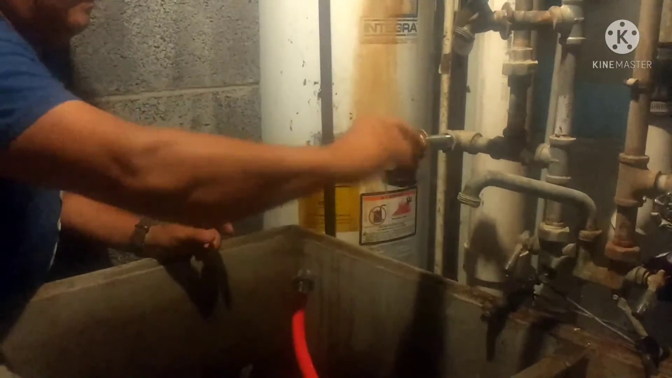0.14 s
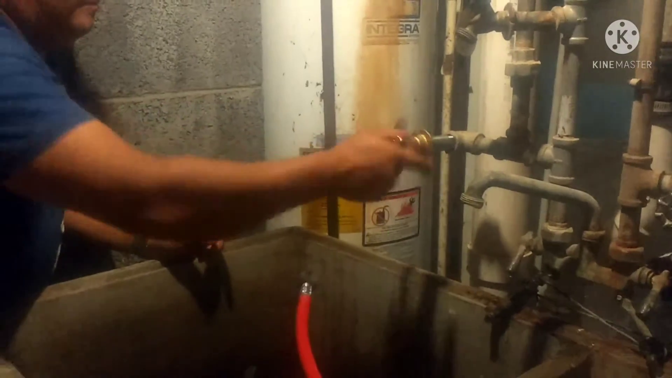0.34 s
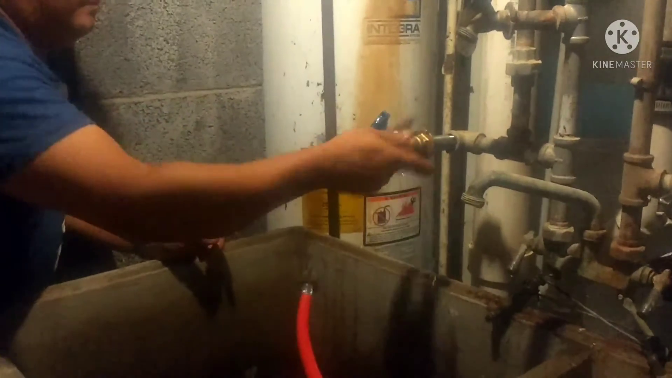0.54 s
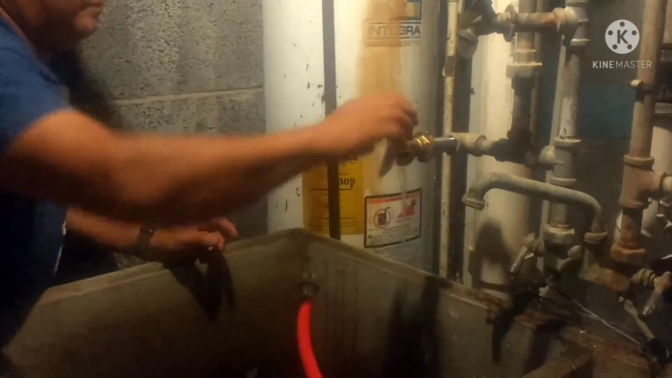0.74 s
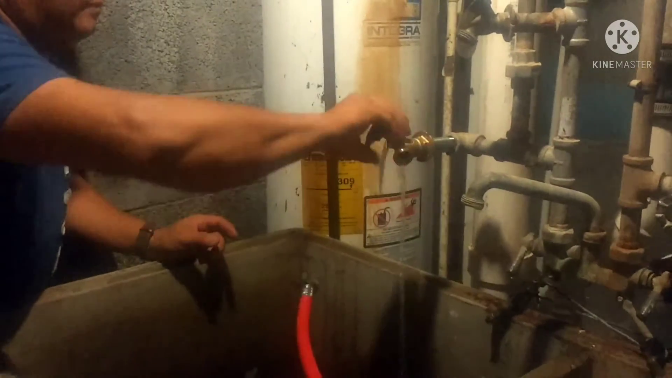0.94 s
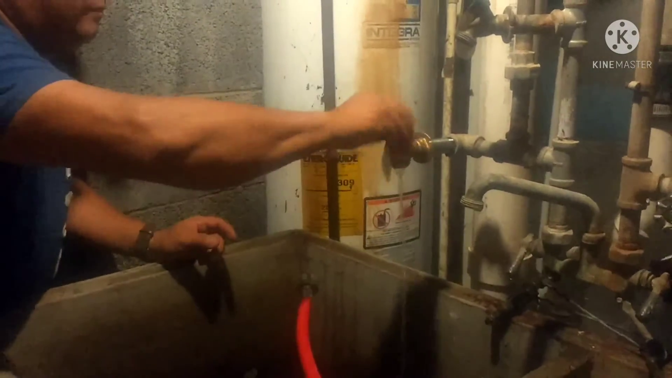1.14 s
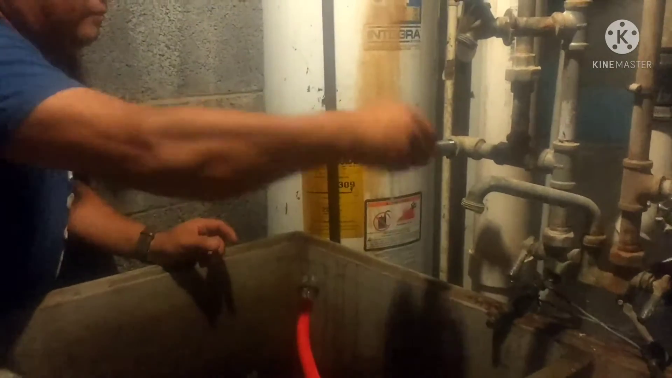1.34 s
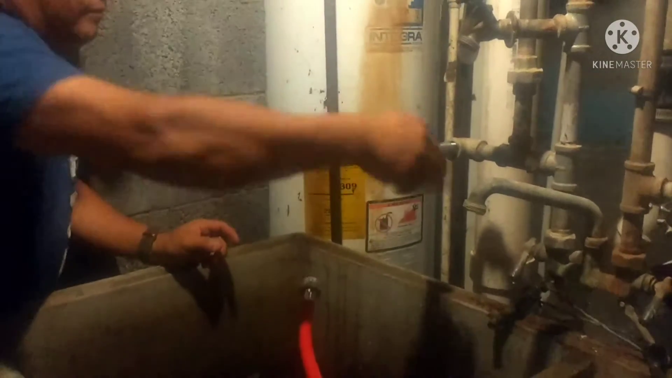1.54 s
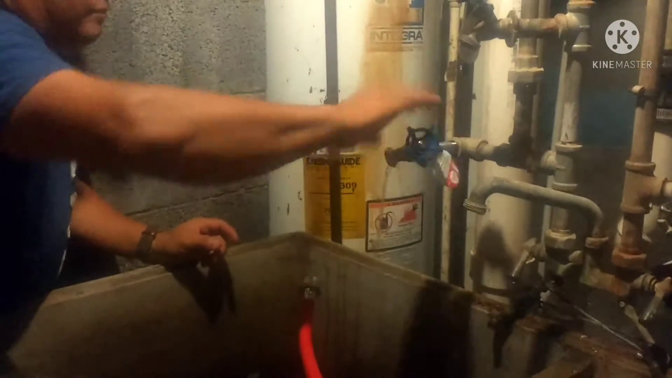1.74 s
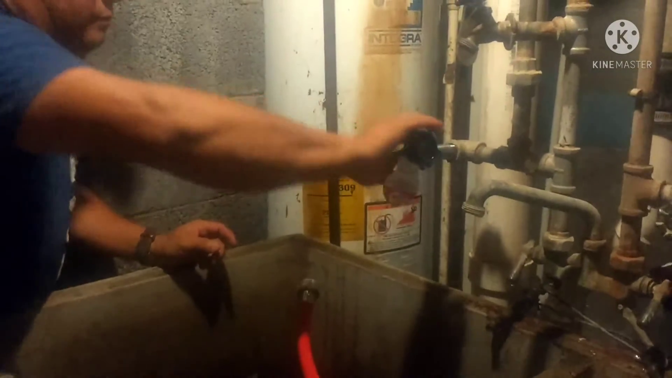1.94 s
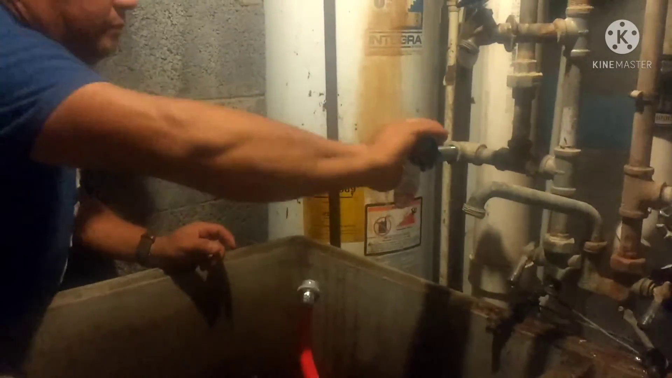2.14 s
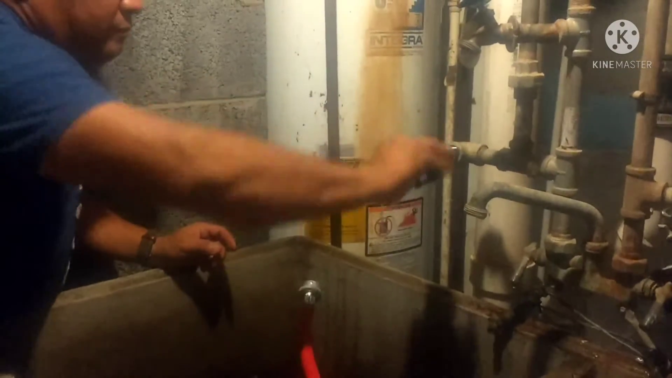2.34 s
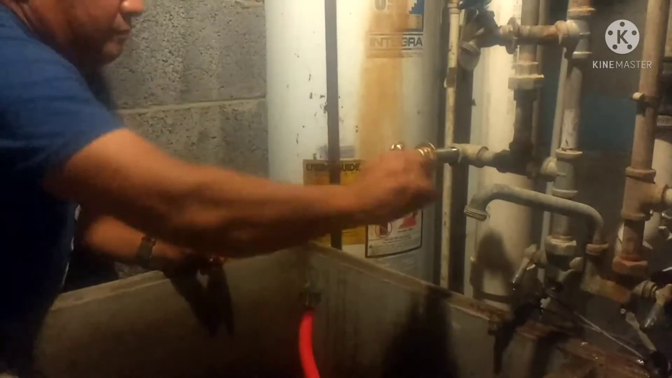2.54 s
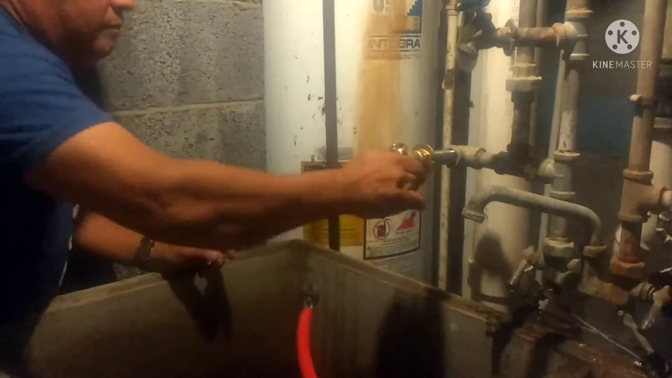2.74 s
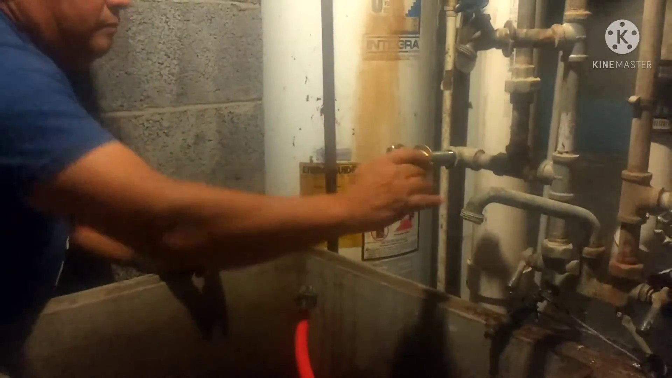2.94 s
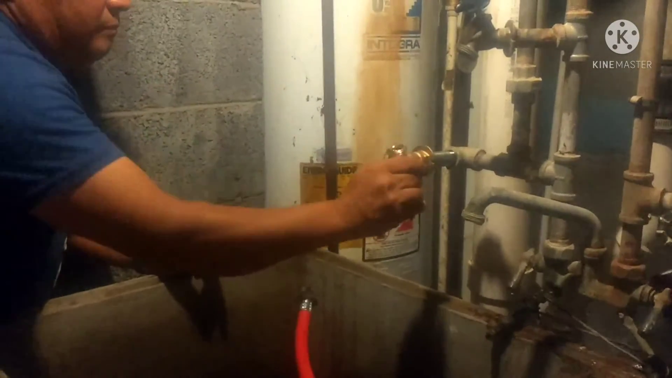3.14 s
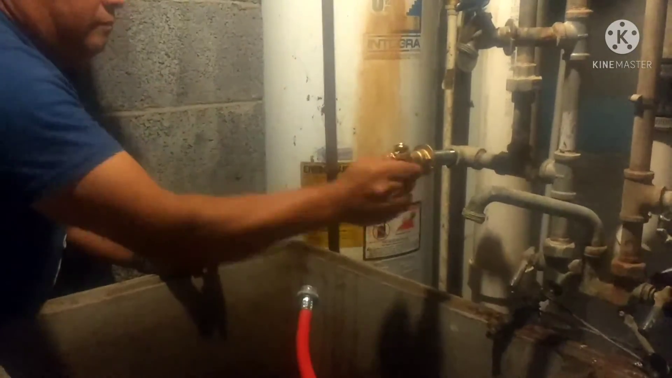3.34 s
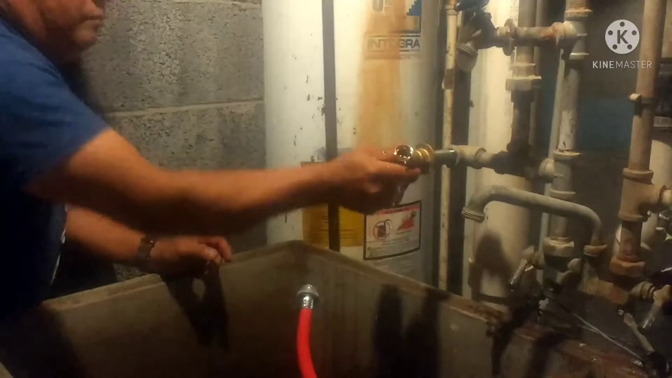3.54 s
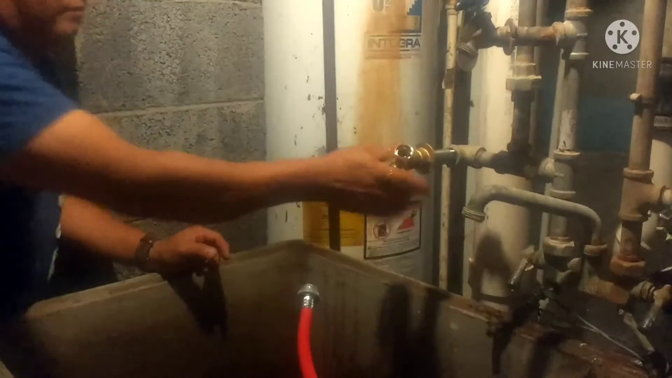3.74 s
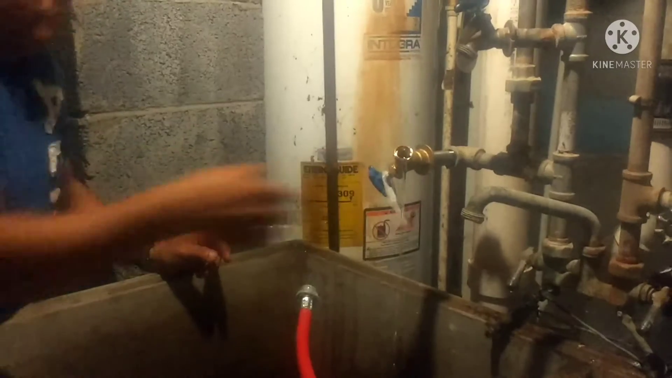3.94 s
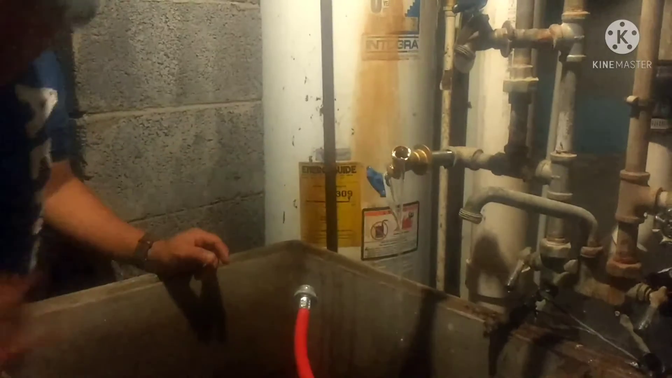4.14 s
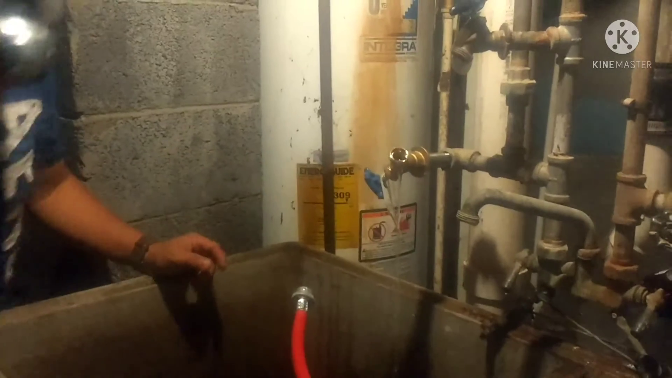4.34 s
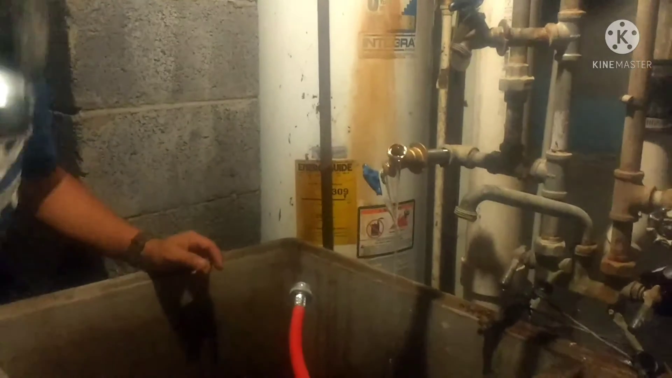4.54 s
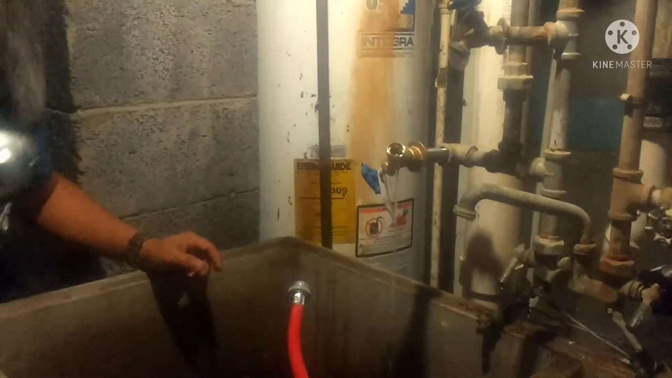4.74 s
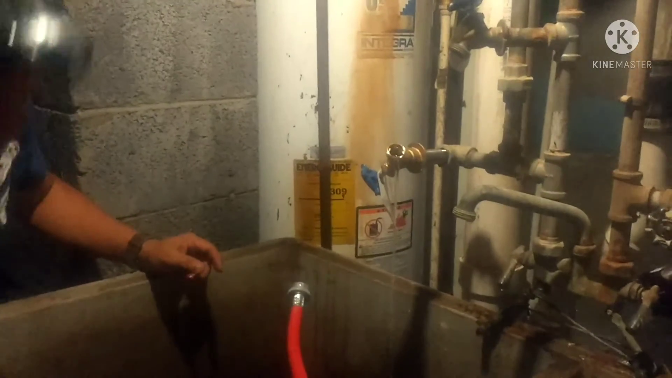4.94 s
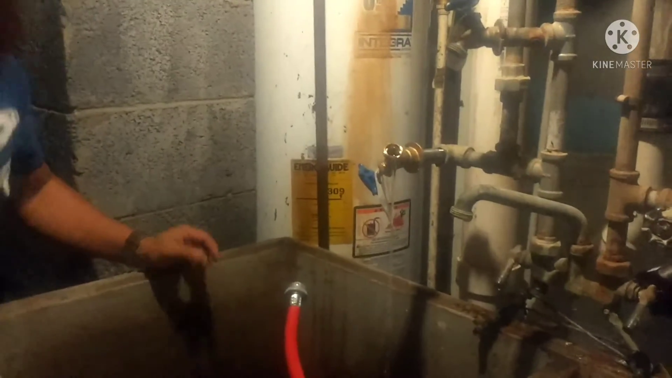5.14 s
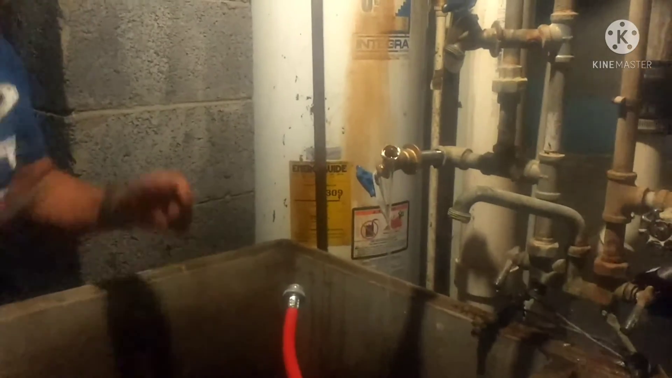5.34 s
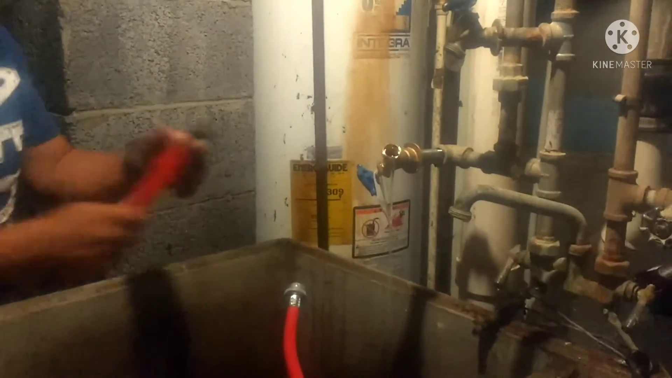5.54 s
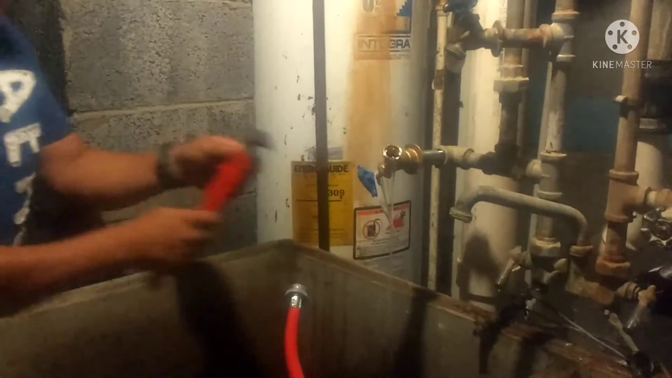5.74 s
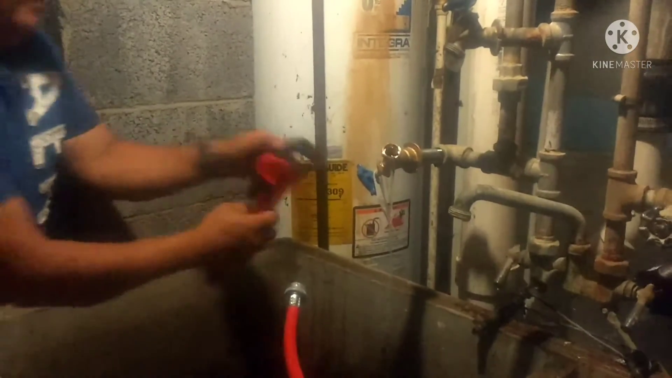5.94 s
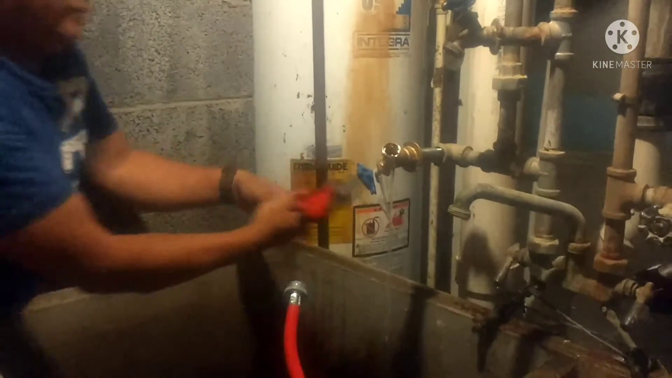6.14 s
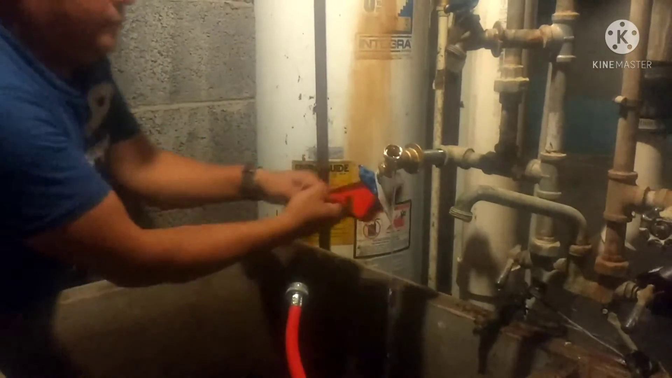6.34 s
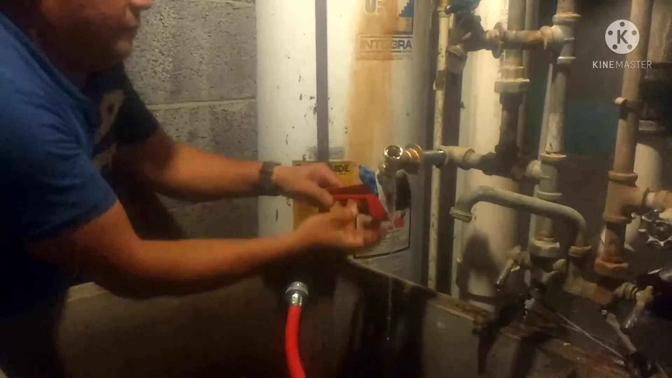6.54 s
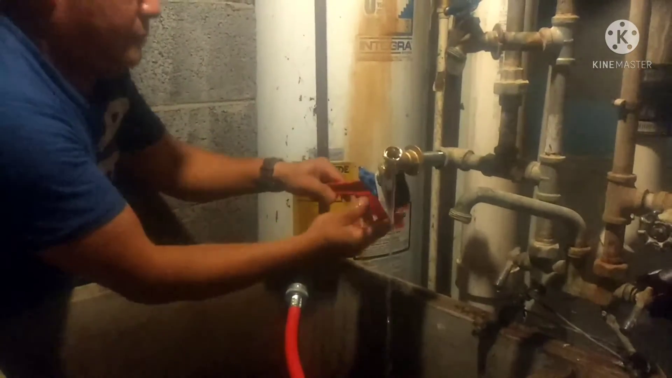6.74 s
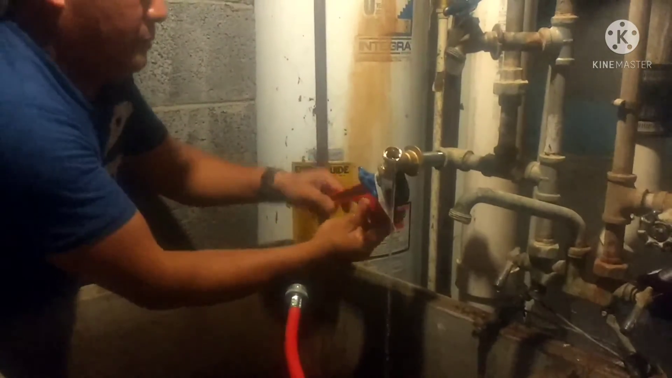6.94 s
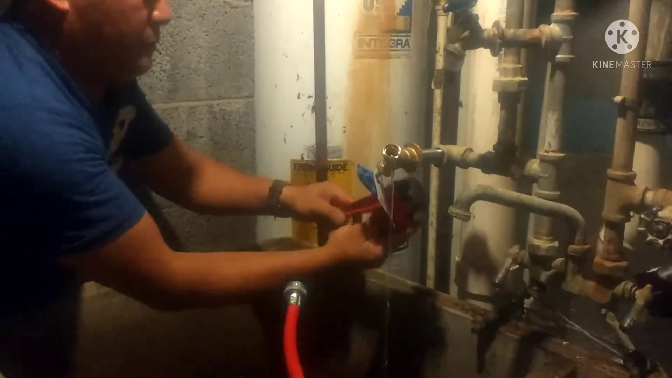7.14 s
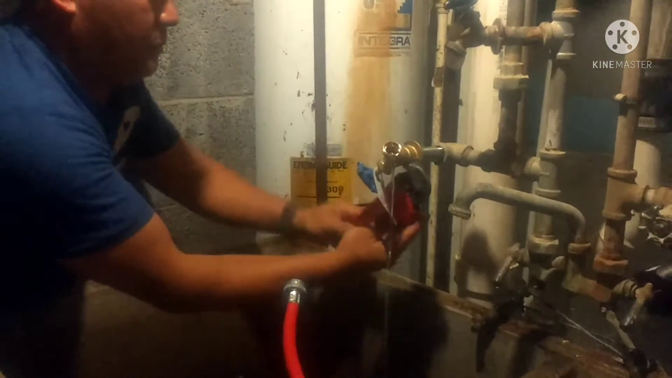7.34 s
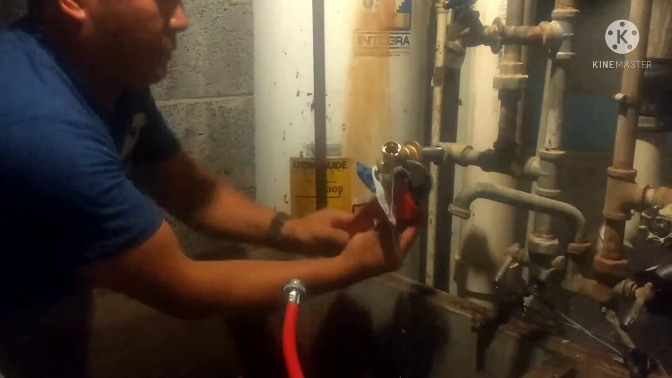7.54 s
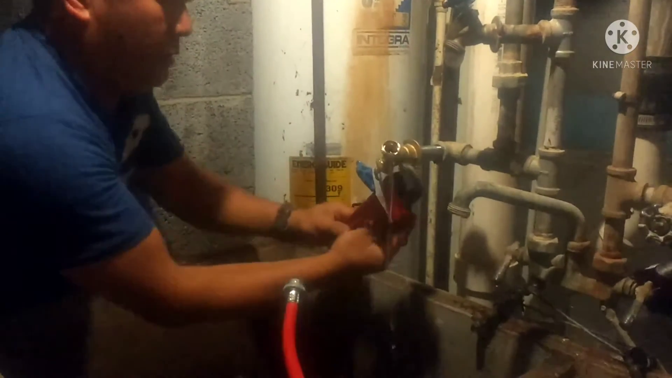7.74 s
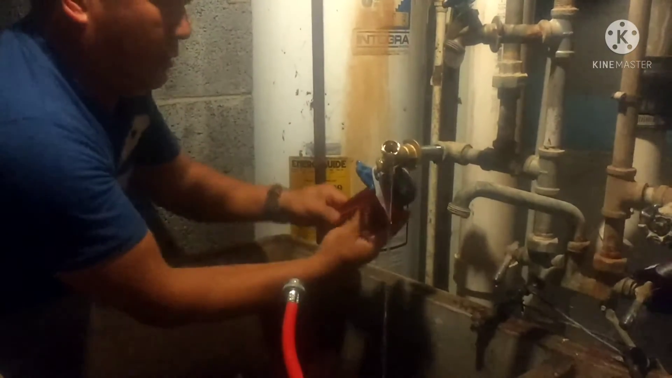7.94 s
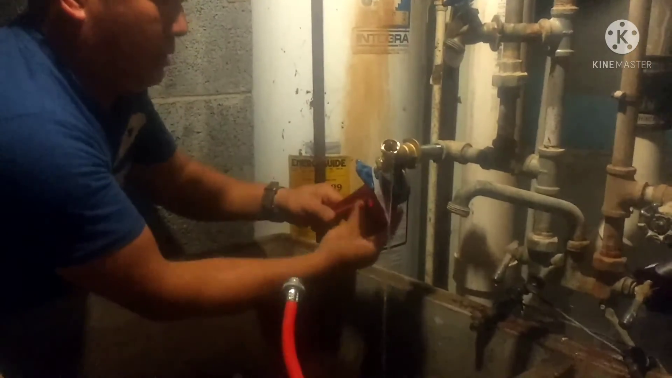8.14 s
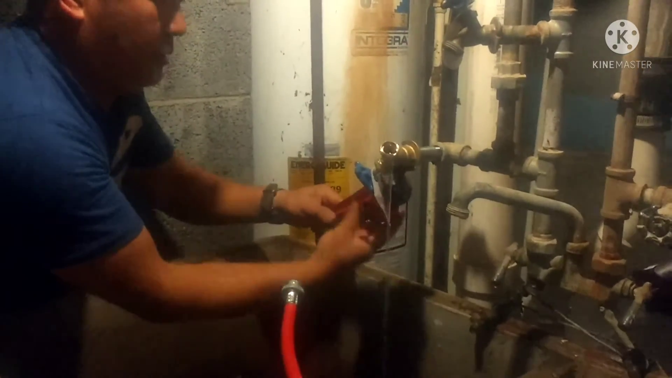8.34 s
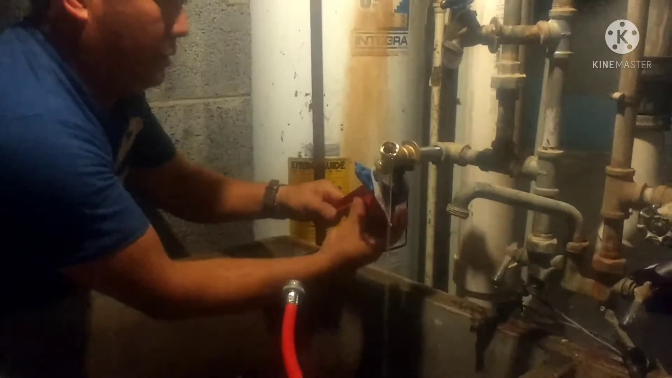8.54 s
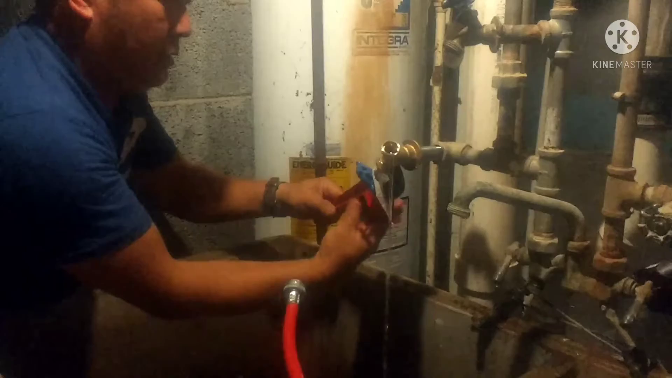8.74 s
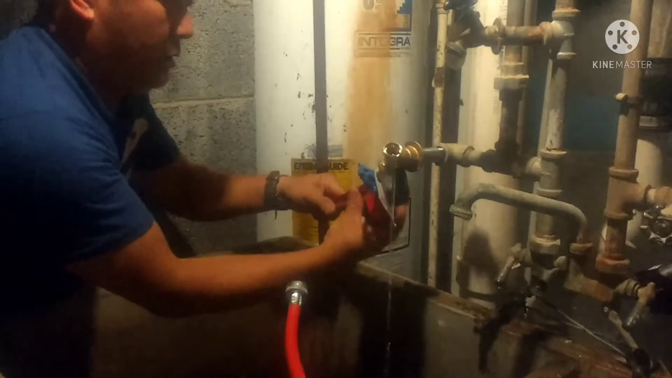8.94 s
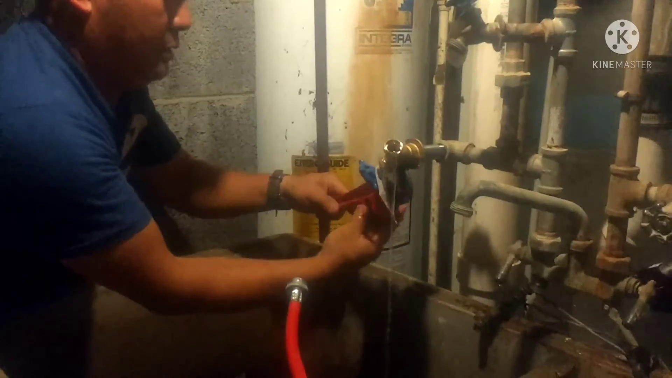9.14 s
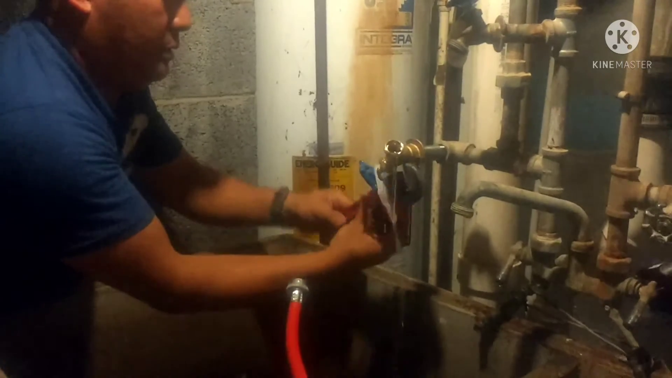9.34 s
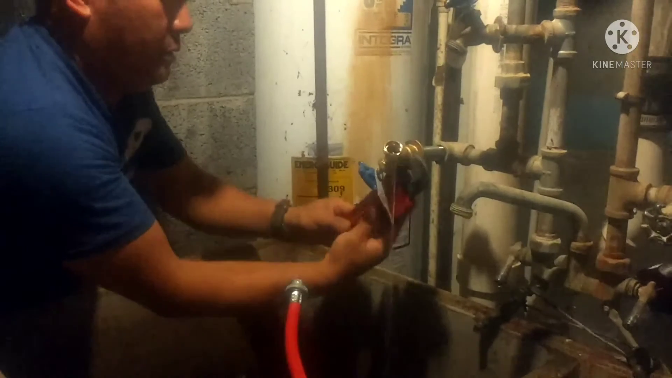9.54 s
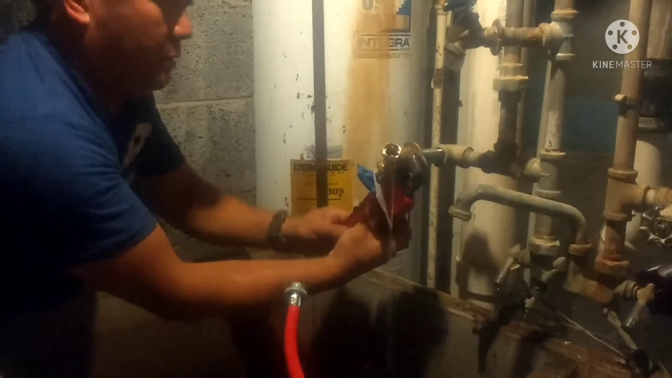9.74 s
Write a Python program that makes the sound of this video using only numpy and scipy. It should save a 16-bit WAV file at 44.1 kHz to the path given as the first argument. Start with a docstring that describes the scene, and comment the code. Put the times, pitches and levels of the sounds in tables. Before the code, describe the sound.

A brass faucet ticks and rustles onto its thread before a pipe wrench clanks and bangs on basement pipes over a faint hush.

```python
"""A concrete basement, where a brass faucet is screwed onto a pipe by hand. Friction makes its thread and
tag rustle, and small impacts make them tick. A pipe wrench is lifted off a laundry tub, its loose jaw
clanks, and it knocks and scrapes on the pipework, whose normal modes boom and ring. The walls reverberate
over a boiler's hush. In the treble the right channel leads and is inverted."""
import sys
import numpy as np
from scipy import signal
from scipy.fft import rfft, irfft, next_fast_len
from scipy.io import wavfile

SR = 44100
rng = np.random.default_rng(int(sys.argv[2]) if len(sys.argv) > 2 else 0)


def pcm_store(signal):
    """Save signal as 16-bit PCM."""
    levels = np.round(np.clip(np.atleast_2d(signal), -1, 1) * 32767)
    wavfile.write(sys.argv[1], SR, levels.astype(np.int16).T)


N = 435708

# spectrum of the hush: frequency_hz, relative_density_db
HUSH_SPECTRUM = [(15, -48), (25, -8.5), (117, 3), (230, 1.5), (500, -1.5), (800, -15), (1500, -4),
                 (2500, -15.5), (5000, -20), (9000, -19), (16000, -59)]
# hands and jaws on the pipes: time_s, grip_db, scrape_db
FRICTION = [(0.0, -57, -66), (1.65, -47, -59.5), (3.74, -57, -68.5), (4.1, -49.5, -60),
            (4.92, -52.5, -67.5), (5.09, -54, -56.5), (5.78, -46, -60.5), (6.33, -48.5, -58),
            (7.7, -39.5, -64), (7.95, -42, -58.5), (8.72, -41, -62.5), (9.13, -49, -61), (9.44, -53, -71.5),
            (9.88, -43, -61)]
# blows on the pipework: start_s, level_db, extra_boom_db, extra_clack_db
PIPE_KNOCKS = [(0.487, -62, 22.5, 1), (1.476, -51, 11, -1), (1.524, -61.5, -16, 16.5), (2.976, -52.5, 5, 4),
               (4.479, -48.5, -30, -1), (6.746, -22.5, 1.5, 0.5), (6.895, -28, 5.5, 1),
               (6.91, -33.5, -3.5, -3), (7.136, -41, 4.5, 5.5), (7.283, -17.5, -3, -8.5),
               (7.362, -30.5, -15, 0.5), (7.52, -36.5, 8, -8), (7.643, -25.5, -8, -5.5),
               (7.674, -20, -2.5, -9.5), (7.796, -26, -19, -10), (7.832, -30, -7, -7.5),
               (8.141, -42, 7, -6), (8.201, -36, 0.5, -11.5), (8.323, -40, 3, -2.5), (8.612, -47, 9, -4),
               (8.733, -40, 10, -20), (8.862, -38, 6.5, -2.5), (8.959, -35.5, -6, -27),
               (9.099, -44.5, 7, 7.5), (9.173, -39.5, 4.5, 3), (9.254, -36, -3.5, -4.5),
               (9.574, -42, -3, -11), (9.62, -33.5, -16, -15), (9.66, -28, -3, -21),
               (9.832, -38.5, 6, -0.5), (9.85, -47, 8, 2)]
# normal modes of pipework, tub and wrench parts: pitch_hz, gain_db, t60_s
PIPE_MODES = [(137, -10.5, 0.18), (146.5, -3, 0.38), (174, -3.5, 0.1), (280.2, -18, 0.58), (409, -8, 0.068),
              (523.7, -16, 0.51), (637, -6, 0.082), (693, -2, 0.049), (766.5, -1.5, 0.21), (832, 3, 0.032),
              (944.4, -3, 0.075), (1000.6, -5, 0.087), (1873, 4, 0.045), (2066, -13.5, 0.29),
              (2150, 2.5, 0.014), (2309, -1.5, 0.084), (2447, -3, 0.053), (2646, -2.5, 0.054)]
TUB_MODES = [(337, -1.5, 0.28), (478, -1, 0.17), (392, 2.5, 0.16), (522, 4.5, 0.094), (269, -18, 0.12),
             (568, -9, 0.11), (684, 3, 0.11), (966, -2.5, 0.15), (1140, 0, 0.08), (1264, -4, 0.15)]
JAW_MODES = [(2627, 6.5, 0.34), (919, -13.5, 0.057)]
HANDLE_MODES = [(2800, 3, 0.36), (3120, -8.5, 0.11)]
NUT_MODES = [(3756, 0.19, 0.051)]
SMALL_PART_MODES = [(5110, 0.5, 0.2), (5970, -9, 0.15), (7680, 5.5, 0.47), (7810, -4.5, 0.13),
                    (8760, 2, 0.25)]
# reverberation time of the basement: frequency_hz, t60_s
ROOM_DECAY = [(150, 1), (600, 0.51), (3000, 0.53), (8000, 0.48), (15000, 0.15)]
# dry ticks of thread, tag and nut: start_s, level_db, pitch_hz, t60_s, edge_db
THREAD_TICKS = [(0.469, -64, 10400, .08, -60), (0.617, -59.5, 7900, .1, -59),
                (0.771, -56, 3400, 0.24, -51.5), (0.8087, -42.5, 5230, 0.15, -39.5),
                (0.876, -50, 5870, 0.15, -42), (0.981, -43.5, 6530, 0.2, -52),
                (1.089, -41, 6550, 0.093, -40.5), (1.108, -50, 6960, .1, -40),
                (1.1427, -17.5, 2810, 0.012, -45), (1.148, -25, 3860, 0.064, -52),
                (1.162, -43.5, 4400, 0.21, -56), (1.518, -65, 7750, 0.065, -49),
                (1.55, -48, 6700, 0.18, -45), (1.6762, -49, 5900, 0.13, -50),
                (1.6956, -43, 4770, 0.11, -56), (1.785, -68, 11900, 0.09, -44.5),
                (2.143, -59, 11000, 0.076, -65), (2.228, -43.5, 1680, 0.087, -64),
                (2.257, -52, 2480, 0.08, -58), (2.272, -56, 5650, 0.076, -45.5),
                (2.433, -54.5, 9600, 0.17, -53), (2.502, -42.5, 5740, 0.14, -47),
                (2.926, -59, 4030, 0.28, -64), (2.974, -51, 3520, 0.25, -61),
                (3.063, -58, 2970, 0.084, -69), (3.801, -53.5, 6350, 0.071, -55),
                (3.885, -55.5, 6340, 0.12, -56), (3.923, -49.5, 4540, 0.12, -53),
                (4.016, -51.5, 5250, 0.14, -50.5), (4.1888, -49.5, 4400, 0.15, -52),
                (4.436, -67, 11700, 0.36, -49.5), (4.5695, -52.5, 4220, 0.16, -57),
                (4.6676, -72, 8900, 0.023, -45.5), (4.8977, -25, 2960, 0.081, -60),
                (5.016, -22.5, 3480, 0.041, -42), (5.02, -30.5, 6080, 0.15, -46),
                (5.323, -38, 7430, 0.13, -43), (5.4877, -43, 5840, 0.14, -53),
                (5.643, -52.5, 8700, 0.043, -57), (5.981, -44, 7060, 0.11, -40.5),
                (6.031, -51, 9000, 0.06, -47.5), (6.058, -43.5, 2680, 0.19, -58),
                (6.175, -41, 6630, 0.37, -57), (6.2678, -35, 4230, 0.11, -46),
                (6.608, -69, 8900, 0.054, -49), (6.667, -47, 7400, 0.079, -52),
                (6.7147, -51, 9200, 0.055, -40), (6.745, -36, 7400, 0.11, -49),
                (6.8986, -32, 2300, 0.24, -44), (7.286, -33.5, 2960, 0.2, -50),
                (7.6438, -38.5, 2720, 0.37, -70), (7.812, -63, 13000, 0.08, -47),
                (7.8423, -40, 2920, 0.33, -46), (7.923, -55, 8850, .08, -48),
                (8.045, -52.5, 4170, 0.15, -46.5), (8.082, -62, 10200, .05, -47),
                (8.1398, -45, 7260, 0.076, -58), (8.213, -46.5, 4440, 0.36, -50),
                (8.328, -43, 4100, 0.1, -52), (8.514, -69, 8900, 0.05, -55), (8.609, -50, 3700, 0.24, -55),
                (8.67, -52, 10100, 0.07, -48), (8.767, -53, 11900, 0.062, -48),
                (8.9264, -47, 7400, 0.089, -45), (9.136, -44.5, 7750, 0.15, -47),
                (9.179, -31, 2890, 0.032, -31), (9.616, -57, 4670, 0.1, -53.5),
                (9.664, -46.5, 4500, 0.14, -53), (9.77, -41, 4220, 0.21, -48)]
# bumps against the tub: start_s, level_db, contact_s
TUB_BUMPS = [(1.484, -42, 0.011), (1.521, -43.5, 0.0063), (4.894, -21.5, 0.034), (4.957, -17, 0.0067),
             (4.975, -22.5, 0.021)]
# gritty strokes: peak_s, level_db, pitch_hz, half_width_s
SCUFF_STROKES = [(1.53, -48.5, 1930, 0.02), (1.89, -54.5, 5550, 0.018), (3.965, -49, 6400, 0.021),
                 (4.486, -47, 2800, 0.037), (6.716, -48, 6700, 0.053), (8.976, -37, 4330, 0.039),
                 (9.1, -49.5, 2600, 0.011), (9.668, -48.5, 2430, 0.04)]
# clanks of the loose jaw: start_s, jaw_db, handle_db, nut_db, small_parts_db, swell_s
WRENCH_CLANKS = [(5.018, -53, -19, -27, -38.5, 0.0079), (5.324, -60, -39.5, -41, -40.5, 0.016),
                 (5.554, -60, -40.5, -71, -72, 0.019), (6.06, -41.5, -34, -62, -59.5, 0.0099),
                 (6.1789, -26.5, -28.5, -30, -38.5, 0.014), (6.268, -58, -60, -32, -47, 0.0063),
                 (6.7175, -54, -50, -50, -47, 0.012), (6.743, -47, -59, -42, -37, 0.01),
                 (8.1464, -67, -65, -52, -45.5, 0.0068), (8.2138, -63, -61, -48, -61, 0.022),
                 (8.323, -53, -56, -43, -50, 0.015), (8.955, -62, -41.5, -37.5, -43, 0.028),
                 (9.074, -62, -46, -33, -52, 0.014), (9.178, -51, -55, -43, -35, 0.0055),
                 (9.6639, -49.5, -54, -55, -58, 0.014)]
# phase lead of the right channel below the treble: frequency_hz, phase_rad
RIGHT_PHASE = [(45, 2.4), (120, .15), (700, .4), (1000, .65), (1200, .8), (1350, 1.3), (1500, 2.5),
               (1650, 2.9), (1850, 3.55)]
# part of the sound that differs between the sides: frequency_hz, amplitude_share
DIFFUSE_SHARE = [(50, .5), (130, .42), (300, .42), (600, .22), (1000, .1), (1500, .3), (2500, .1),
                 (7000, .24), (10000, .36), (15000, .5)]


def amp(db):
    """Amplitude grows tenfold per 20 dB."""
    return 10 ** (np.asarray(db) / 20)


def unit_rms(x):
    """Normalisation to a mean power of 1."""
    return x / np.sqrt(np.mean(np.abs(x) ** 2) + 1e-20)


def at_hz(points, hz):
    """Interpolation on a log-frequency axis."""
    frequencies, values = np.transpose(points)
    return np.interp(np.log(hz), np.log(frequencies), values)


def band(x, low_hz, high_hz, order=2):
    """Band-pass filtering."""
    sos = signal.butter(order, [low_hz, min(high_hz, .45 * SR)], "band", fs=SR, output="sos")
    return signal.sosfilt(sos, x)


def add(out, start_s, sound):
    """Superposition: a sound adds to those already present."""
    i = round(start_s * SR)
    out[i:i + len(sound)] += sound[:N - i]


def ring(force, hz, t60):
    """Damped resonance: a unit impulse starts a decaying sine of amplitude 1."""
    r, w = amp(-60 / (t60 * SR)), 2 * np.pi * hz / SR
    return signal.lfilter([0, np.sin(w)], [1, -2 * r * np.cos(w), r * r], force + 1e-18)


def grains(per_s, spread_db):
    """Shot noise: random clicks of uneven size."""
    sizes = amp(spread_db * np.minimum(rng.exponential(1, N), 5)) * rng.choice([-1, 1], N)
    return unit_rms(sizes * (rng.random(N) < per_s / SR))


def impacts(starts, levels_db, contact_s):
    """Impact force rises fast and decays over the contact time; the level sets its energy."""
    out, t = np.zeros(N), np.arange(SR // 4) / SR
    for start_s, db, length_s in np.broadcast(starts, levels_db, contact_s):
        pulse = (1 - np.exp(-t / (0.02 * length_s))) * np.exp(-t / length_s)
        add(out, start_s, amp(db) * pulse / np.sqrt(np.sum(pulse ** 2)))
    return out


def body(force, modes, modes_db, wash_db, span_hz):
    """Modal response: a rough force rings the strong modes; the weak ones overlap in a wash of noise."""
    drive = force * rng.standard_normal((3, N))
    rings = sum(amp(db) * ring(drive[k % 2], hz, t60)
                for k, (hz, db, t60) in enumerate(modes) if span_hz[0] <= hz < span_hz[1])
    return amp(modes_db) * rings + amp(wash_db) * band(drive[2], *span_hz, order=3)


def scatter(x, size, decays=None):
    """Diffusion: each short slice keeps its spectrum, loses its phase and lingers if given decay times."""
    hz, times, slices = signal.stft(x, SR, nperseg=size, noverlap=size // 2)
    power = np.abs(slices) ** 2
    if decays:
        retained = amp(-60 * (times[1] - times[0]) / at_hz(decays, hz + 1)) ** 2
        for k in range(1, len(times)):
            power[:, k] = (1 - retained) * power[:, k] + retained * power[:, k - 1]
    dephased = np.sqrt(power) * np.exp(2j * np.pi * rng.random(power.shape))
    out = signal.istft(dephased, SR, nperseg=size, noverlap=size // 2)[1][:N]
    return unit_rms(out) * np.sqrt(np.mean(x ** 2))


def boiler_hush():
    """Stationary noise, strongest in the bass."""
    hz = np.maximum(np.fft.rfftfreq(N, 1 / SR), 1)
    spectrum = rfft(rng.standard_normal(N)) * amp(at_hz(HUSH_SPECTRUM, hz))
    return amp(-61.5) * unit_rms(irfft(spectrum, N))


def rubbing(scrape_db):
    """Sliding friction is a stream of tiny impacts: coarse for metal on metal, finer for skin and tag."""
    scrape = unit_rms(band(grains(2000, spread_db=-0.5), 1300, 5000))
    rustle = unit_rms(band(grains(3800, spread_db=-10), 3600, 22200))
    decay = amp(-60 / (0.059 * SR))   # sparse, crisp crackles with a t60 of 59 ms
    bursts = signal.lfilter([1], [1, -decay], np.abs(grains(45, spread_db=6.5)))
    crackle = unit_rms(band(bursts * rng.standard_normal(N), 6500, 20000))
    rustle_db = -68.5 + scrape_db - scrape_db.mean()
    return amp(scrape_db) * scrape + amp(rustle_db) * (rustle + amp(-3) * crackle)


def pipework(grip_db):
    """Forced vibration: knocks and a wavering grip drive the pipes; low modes are pushed longest."""
    starts, level_db, extra_boom_db, extra_clack_db = np.transpose(PIPE_KNOCKS)
    waver_hz, waver_db = 4.9, 2
    slow = signal.butter(2, waver_hz, fs=SR, output="sos")
    waver = unit_rms(signal.sosfilt(slow, rng.standard_normal(N)))
    grip = amp(grip_db + waver_db * waver)
    boom_force = impacts(starts, level_db + extra_boom_db, contact_s=0.048) + amp(-36) * grip
    middle_force = impacts(starts, level_db, contact_s=0.032) + amp(-31.5) * grip
    clack_force = impacts(starts, level_db + extra_clack_db, contact_s=0.024) + amp(-46.5) * grip
    boom = body(boom_force, PIPE_MODES, modes_db=-8.5, wash_db=32.2, span_hz=(115, 278))
    middle = body(middle_force, PIPE_MODES, modes_db=-10, wash_db=24.3, span_hz=(420, 1070))
    clack = body(clack_force, PIPE_MODES, modes_db=-2.6, wash_db=20, span_hz=(1200, 5400))
    return boom + middle + clack


def room(x):
    """Reverberation: concrete walls and pipes return a dense tail some 15 ms late."""
    tail = scatter(x, size=1024, decays=ROOM_DECAY)
    return amp(-7.5) * np.r_[np.zeros(SR // 65), tail][:N]


def ticks():
    """A brief impact has a broad spectrum: a puff of noise with a crack, a short ring and a fine edge."""
    out, t = np.zeros(N), np.arange(SR // 5) / SR
    attack = 1 - np.exp(-t / 0.00097)
    snap = 1 + amp(-1.5) * np.exp(-t / 0.0011)   # the first instant stands out
    for start_s, db, hz, t60, edge_db in THREAD_TICKS:
        noise = rng.standard_normal((3, len(t)))
        fall_db = -60 * t / min(t60, .3)
        puff = unit_rms(band(noise[0], hz / 1.72, hz * 1.173))
        crack = amp(-1.5) * band(noise[1], 1330, 5770)
        ping = amp(-0.65 + 0.3 * fall_db) * unit_rms(band(noise[1], hz / 1.04, hz * 1.04))
        edge = amp(edge_db + fall_db / 0.9) * band(noise[2], 5000, 23300, order=3)
        tick = amp(db + fall_db) * (puff + crack + ping) + edge
        add(out, start_s - .001, tick * attack * snap)
    return out


def tub():
    """Plate vibration: dull blows excite the modes of the tub wall."""
    force = impacts(*np.transpose(TUB_BUMPS))
    wall = body(force, TUB_MODES, modes_db=-10.5, wash_db=26.2, span_hz=(270, 2000))
    return band(wall, 180, 4000)


def scuffs():
    """Friction in short strokes: coarse grains swell and fade under a bell-shaped envelope."""
    out, t = np.zeros(N), np.arange(-SR // 6, SR // 6) / SR
    grit = grains(1500, spread_db=2)
    for peak_s, db, hz, half_width_s in SCUFF_STROKES:
        end = round(peak_s * SR)
        rasp = unit_rms(band(grit[end - len(t):end], hz / 2.56, hz * 1.31))
        add(out, peak_s + t[0], amp(db) * np.exp(-(t / half_width_s) ** 2) * rasp)
    return out


def wrench_clanks():
    """Damped vibration: the jaw chatters, so each mode swells and flutters; the hand leaves a weak tail."""
    out, t = np.zeros(N), np.arange(2 * SR // 5) / SR
    flutter_hz, firm_db, strike_spread_db, damped_db = 85, -26, 6.5, -31
    smooth = signal.butter(2, flutter_hz, fs=SR, output="sos")
    parts = JAW_MODES, HANDLE_MODES, NUT_MODES, SMALL_PART_MODES
    for start_s, *part_dbs, swell_s in WRENCH_CLANKS:
        rise = t / swell_s
        swell = (rise * np.exp(1 - rise)) ** 2.4
        modes = [(hz, db + part_db, t60) for part, part_db in zip(parts, part_dbs) for hz, db, t60 in part]
        noise = signal.sosfilt(smooth, rng.standard_normal((2, len(modes), len(t))))
        flutters = unit_rms(noise[0] + 1j * noise[1])
        phases, strikes = rng.random(len(modes)), rng.standard_normal(len(modes))
        for (hz, db, t60), flutter, phase, strike in zip(modes, flutters, phases, strikes):
            loose = np.clip((firm_db - db) / 30, 0, 1)   # weakly struck modes rattle more than they ring
            tone = np.exp(2j * np.pi * (hz * t + phase))
            chatter = swell * (1 - loose + (0.08 + loose) * flutter)
            tail = amp(damped_db - 60 * t / t60) * (1 - np.exp(-rise))
            tail = tail * (1 - loose + 0.85 * flutter)
            gain = amp(db + strike_spread_db * strike * loose)
            add(out, start_s - .001, gain * np.imag((chatter + tail) * tone))
    return out


def scene():
    """Superposition at one point of the room; small bodies radiate no deep bass."""
    times, *levels = np.transpose(FRICTION)
    grip_db, scrape_db = [np.interp(np.arange(N) / SR, times, db) for db in levels]
    work = ticks() + scuffs() + wrench_clanks() + pipework(grip_db) + tub()
    bass_cut = signal.butter(4, 112, "high", fs=SR, output="sos")
    work = signal.sosfilt(bass_cut, work + room(work))
    mono = work + rubbing(scrape_db) + boiler_hush()
    return np.array([mono, mono])


def record(dry):
    """Phase difference and partial coherence between the channels give width; the top treble is cut."""
    lead_s, diffuse_delay_s, stopband_hz = 24.6 / SR, .015, 16100
    size = next_fast_len(N + SR // 4)
    hz = np.maximum(np.fft.rfftfreq(size, 1 / SR), 1)
    treble_phase = 2 * np.pi * hz * lead_s - np.pi + .2   # early and inverted
    right_phase = np.where(hz < RIGHT_PHASE[-1][0], at_hz(RIGHT_PHASE, hz), treble_phase)
    share = at_hz(DIFFUSE_SHARE, hz)
    delay = np.exp(-2j * np.pi * hz * diffuse_delay_s)
    lows = rfft(scatter(dry[0], size=2048), size)
    highs = rfft(scatter(dry[0], size=256), size)
    diffuse = share * delay * np.where(hz < 700, lows, highs)
    coherent = np.sqrt(1 - share ** 2) * rfft(dry[0], size)
    left = coherent + diffuse
    right = (coherent - diffuse) * np.exp(1j * right_phase)
    stereo = irfft([left, right], size)[:, :N]
    return signal.sosfilt(signal.cheby2(20, 70, stopband_hz, fs=SR, output="sos"), stereo)


dry = scene()
out = record(dry)
pcm_store(out)
```